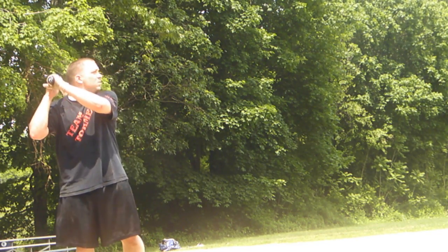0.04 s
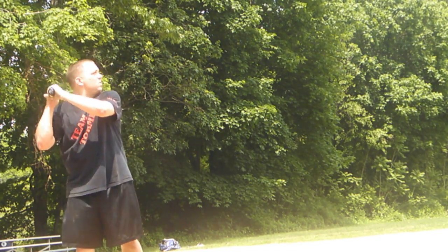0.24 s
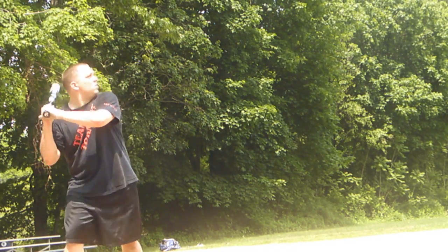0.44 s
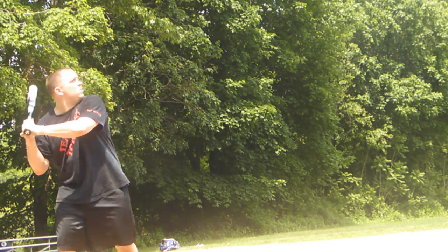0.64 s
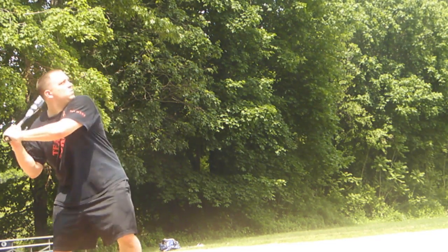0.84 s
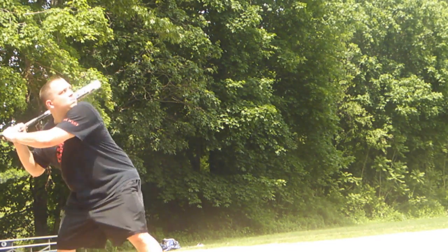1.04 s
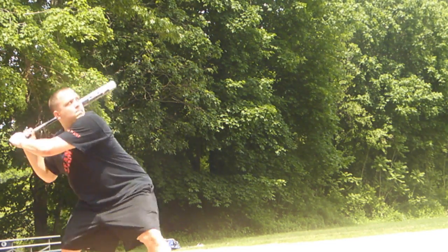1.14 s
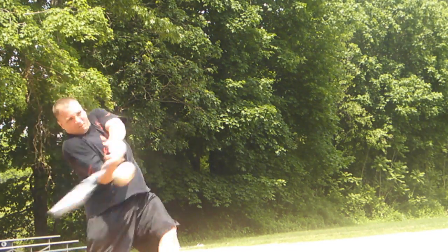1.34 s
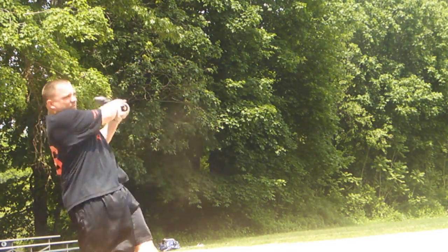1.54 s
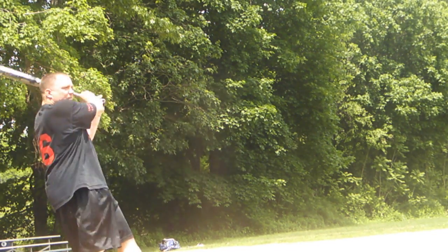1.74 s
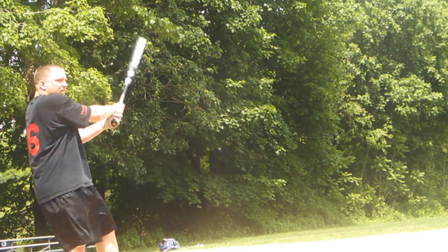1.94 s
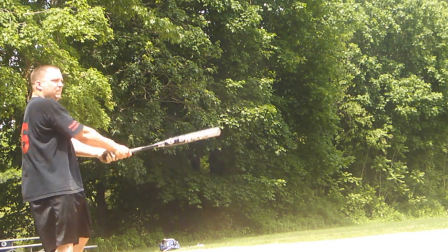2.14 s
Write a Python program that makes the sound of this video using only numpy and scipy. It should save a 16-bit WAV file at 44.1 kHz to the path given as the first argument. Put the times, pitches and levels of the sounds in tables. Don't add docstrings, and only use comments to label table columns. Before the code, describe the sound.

A hollow metal bat hits a ball with one loud, dry crack and thin ping, after faint cloth rustle and a quick swish; trees return a brief wash, then birds chirp, on a small camera microphone.

```python
import sys
import numpy as np
from scipy import signal
from scipy.fft import rfft, irfft
from scipy.io import wavfile
from scipy.ndimage import uniform_filter1d, map_coordinates

SR = 44100
rng = np.random.default_rng(int(sys.argv[2]) if len(sys.argv) > 2 else 0)


def voltage_ratio(decibels):
    exponent = np.asarray(decibels, float) / 20
    return 10 ** exponent


def to_wav(s):
    ch = np.atleast_2d(s).T
    pcm = np.round(np.clip(ch, -1, 1) * 32767)
    wavfile.write(sys.argv[1], SR, pcm.astype(np.int16))


N = 95873

# [f/Hz, level/dB]
AIR_SPECTRUM = [(15, -76), (25, -17), (145, -1), (309, -6.5), (394, -9.5), (911, -14.5), (5730, -30.5),
                (7710, -35), (16000, -35.5)]
AIR_DB = -42
# [start t/s, length t/s, f/Hz, width f/Hz, level/dB]
FAR_WHINES = [(0, 2.17, 937, 10, -58.5), (1.95, .3, 1305, 70, -48), (2.09, .2, 1630, 45, -56),
              (.14, .34, 2290, 60, -59), (.07, .15, 3100, 90, -59), (.19, .11, 2800, 350, -59),
              (.34, .29, 4700, 350, -60), (.38, .25, 3500, 600, -58), (.38, .25, 4200, 700, -62),
              (.94, .05, 7000, 400, -63), (1.41, .02, 4350, 120, -53), (.95, .2, 937, 14, -60),
              (.85, .55, 3600, 1000, -60)]
# [start t/s, length t/s, from f/Hz, to f/Hz, level/dB]
BIRD_NOTES = [
    (1.845, .015, 4500, 4100, -63),
    (1.862, .03, 3960, 3900, -57),
    (2.0, .024, 3400, 2850, -60),
    (2.037, .016, 3880, 3880, -59),
    (2.058, .03, 3350, 3550, -57),
    (1.968, .008, 3150, 2900, -62),
    (1.80, .035, 3450, 3400, -62),
]

# [t/s, leaves level/dB, trunks level/dB]
WASH_CURVE = [
    (1.495, -34, -35),
    (1.53, -35.5, -51.5),
    (1.565, -28.5, -34),
    (1.605, -27.5, -33),
    (1.66, -33, -35.5),
    (1.72, -38, -38.5),
    (1.8, -45, -46),
    (1.9, -51, -54.5),
    (2.17, -64, -61),
]
# [f/Hz, level/dB]
LEAF_SPECTRUM = [(760, -28), (1300, -5), (2300, -1), (4540, 0), (6350, 2.5), (8790, -2.5), (11000, 0.5),
                 (16000, -10.5)]
TRUNK_SPECTRUM = [(200, -17.5), (350, -7.5), (620, -1.5), (900, -4), (1300, -6), (2500, -34.5)]
# [t/s, f/Hz, level/dB]
TRUNK_KNOCKS = [(1.552, 600, -37), (1.567, 610, -29), (1.596, 780, -32), (1.607, 660, -33),
                (1.661, 930, -31), (1.69, 800, -35), (1.80, 680, -41)]
KNOCK_S, KNOCK_DB = .006, -1
PING_ECHO_DB, PING_WIDTH_HZ = -4, 65
LEAF_DULLING_DB_PER_S = -37

# [t/s, level/dB]
RUSTLE_CURVE = [
    (0, -64),
    (.55, -59.5),
    (.62, -49),
    (.68, -70),
    (1.15, -59),
    (1.25, -48.5),
    (1.34, -43.5),
    (1.44, -43),
    (1.5, -62),
    (1.6, -92),
]
# [t/s, level/dB]
GRIT_TICKS = [
    (1.004, -46),
    (1.416, -40),
]
# [t/s, level/dB]
SWISH_CURVE = [
    (1.38, -70),
    (1.43, -48),
    (1.448, -37),
    (1.46, -30),
    (1.472, -28),
    (1.486, -29),
    (1.5, -33),
    (1.512, -48),
    (1.54, -90),
]
# [f/Hz, level/dB]
SWISH_SPECTRUM = [(70, -28), (160, -5), (330, 3), (800, -6), (1650, -18.5), (2600, -11), (6000, -19),
                  (10000, -13), (16000, -20)]

HIT_S = 1.4885
CRACK_DB, CRACK_HOLD_S, CRACK_T60_S = -9, .0012, .003
SQUASH_S, REBOUND_S = .0016, .0007
PUSH_DB, REBOUND_DB = -15, -8.5
# [f/Hz, level/dB, decay by 60 dB t/s]
BARREL_MODES = [(420, -26, .015), (650, -24, .025), (850, -19, .04), (970, -27, .06), (1221, -35, .6),
                (1270, -38, .2), (1450, -16, .01), (2050, -11, .008), (2800, -13, .006), (4300, -15, .005),
                (5300, -15, .005), (6150, -8, .008)]
# [delay t/s, length t/s, level/dB]
GROUND_SLAPS = [
    (.0030, .0008, -14),
    (.0056, .0005, -2),
    (.0082, .0005, -19),
    (.0125, .001, -18),
    (.0155, .0008, -19),
    (.0195, .001, -18),
    (.031, .001, -22),
]

# [f/Hz, width f/Hz, depth level/dB]
DEAD_SLOTS = [(7858, 397, -23), (11730, 146, -40)]
DUCK_DB, DUCK_RELEASE_S = -27, 0.089
TOP, HISS_DB, CUTOFF_HZ = .95, -80, 15780


def rms_one(x):
    return x / np.sqrt(np.mean(x ** 2) + 1e-20)


def in_time(rows):
    s, *columns = np.transpose(rows)
    return [np.interp(np.arange(N) / SR, s, c) for c in columns]


def white():
    return rng.standard_normal(N)


def coloured(x, spectrum):
    hz, db = np.transpose(spectrum)
    log_f = np.log(np.arange(N // 2 + 1) * SR / N + 1)
    return rms_one(irfft(rfft(x) * voltage_ratio(np.interp(log_f, np.log(hz), db)), N))


def drift(rate):
    knots = rng.standard_normal(400)
    return map_coordinates(knots, [np.arange(N) / SR * rate], order=3)


def grains(lumpy_db):
    lump_db = lumpy_db * rng.standard_normal(N // 64 + 1).repeat(64)[:N]
    return white() * voltage_ratio(lump_db)


def ring(x, hz, t60):
    r, w = voltage_ratio(-60 / (t60 * SR)), 2 * np.pi * hz / SR
    return signal.lfilter([0, np.sin(w)], [1, -2 * r * np.cos(w), r * r], x + 1e-18)


def narrow(hz, width):
    f = np.arange(N // 2 + 1) * SR / N
    band = np.exp(-((f - hz) / width) ** 2 * 2)
    z = signal.hilbert(irfft(rfft(white()) * band, N))
    return rms_one(z.real / (np.abs(z) + 1e-9) ** .3)


def swell(start, length, edge):
    t = np.arange(N) / SR - start
    nearest_edge = np.minimum(t + edge, length - t + edge)
    return np.sin(np.pi / 2 * np.clip(nearest_edge / edge / 2, 0, 1)) ** 2


def park_air():
    return voltage_ratio(AIR_DB + 0.64 * drift(9.18)) * coloured(white(), AIR_SPECTRUM)


def far_whines():
    out = np.zeros(N)
    for start, length, hz, width, db in FAR_WHINES:
        out += voltage_ratio(db) * swell(start, length, 0.0067) * narrow(hz, width)
    return out


def birds():
    out = np.zeros(N)
    for start, length, from_hz, to_hz, db in BIRD_NOTES:
        pitch = np.interp(np.arange(N) / SR, [start, start + length], [from_hz, to_hz])
        level = voltage_ratio(db + 8) * swell(start, length, .004) * voltage_ratio(2 * drift(150))
        out += level * np.sin(2 * np.pi * np.cumsum(pitch) / SR)
    return out


def park():
    return park_air() + far_whines() + birds()


def leaves(leaves_db):
    t = np.arange(N) / SR
    wash = voltage_ratio(leaves_db) * coloured(grains(1.0), LEAF_SPECTRUM)
    treble = signal.sosfilt(signal.butter(2, 9000, "high", fs=SR, output="sos"), wash)
    return wash - treble + treble * voltage_ratio(LEAF_DULLING_DB_PER_S * np.clip(t - 1.62, 0, 1))


def trunks(trunks_db):
    t = np.arange(N) / SR
    out = voltage_ratio(trunks_db) * coloured(grains(4.0), TRUNK_SPECTRUM)
    out += voltage_ratio(trunks_db + PING_ECHO_DB) * narrow(1222, PING_WIDTH_HZ)
    for s, hz, db in TRUNK_KNOCKS:
        out += voltage_ratio(db + KNOCK_DB) * np.exp(-((t - s) / KNOCK_S) ** 2) * np.sin(2 * np.pi * hz * t)
    return out


def woods():
    leaves_db, trunks_db = in_time(WASH_CURVE)
    arrived = np.arange(N) / SR > WASH_CURVE[0][0]
    return arrived * (leaves(leaves_db) + trunks(trunks_db))


def clothes():
    t = np.arange(N) / SR
    rub = coloured(grains(2.6), [(300, 4), (1200, 6.5), (4000, -10.5), (11000, -9)])
    tick_level = sum(voltage_ratio(db) * np.exp(-np.abs(t - s) / .0012) for s, db in GRIT_TICKS)
    grit = coloured(white(), [(6000, -43), (9000, 6), (16000, -9)])
    return voltage_ratio(in_time(RUSTLE_CURVE)[0]) * rub + tick_level * grit


def swish():
    return voltage_ratio(in_time(SWISH_CURVE)[0] + drift(120)) * coloured(white(), SWISH_SPECTRUM)


def barrel():
    click = np.zeros(N)
    click[int(HIT_S * SR) + 8] = -1
    return sum(voltage_ratio(db) * ring(click, hz, t60) for hz, db, t60 in BARREL_MODES)


def ball_push():
    t = np.arange(N) / SR - HIT_S
    squash = -voltage_ratio(PUSH_DB) * (t > 0) * (t < SQUASH_S) * np.sqrt(np.abs(t) / SQUASH_S)
    rebound = voltage_ratio(REBOUND_DB) * (t > SQUASH_S) * np.exp(-np.abs(t - SQUASH_S) / REBOUND_S)
    return uniform_filter1d(squash + rebound, size=12)


def strike():
    t = np.arange(N) / SR - HIT_S
    snap = coloured(white(), [(700, -7), (1400, -2.5), (3000, -6.5), (6200, -12), (10000, -6.5), (15000, -13.5)])
    push = ball_push()
    out = barrel()
    direct = (0.00012, CRACK_HOLD_S, 0.0063)
    for s, hold, db in [direct] + GROUND_SLAPS:
        decay_db = -60 * np.clip(t - s - hold, 0, 1) / CRACK_T60_S
        out += (t > s) * voltage_ratio(CRACK_DB + db + decay_db) * snap
        out += voltage_ratio(7 * db) * np.roll(push, int(s * SR))
    return out


def scene():
    t = np.arange(N) / SR - HIT_S
    duck = voltage_ratio(DUCK_DB * (t > 0) * np.exp(-np.abs(t) / DUCK_RELEASE_S))
    return (duck * park() + woods() + clothes() + swish() + strike())[None]


def low_pass(x):
    return signal.sosfilt(signal.butter(12, 16840, fs=SR, output="sos"), x)


def record(dry):
    f = np.arange(N // 2 + 1) * SR / N
    slots = voltage_ratio(sum(db * np.exp(-((f - hz) / width) ** 2) for hz, width, db in DEAD_SLOTS))
    hiss = voltage_ratio(HISS_DB) * white()
    limited = TOP * np.tanh(dry / TOP)
    mix = irfft((rfft(limited) * slots + rfft(hiss)) * (f < CUTOFF_HZ), N)
    return low_pass(mix)


dry = scene()
out = record(dry)
to_wav(out)
```